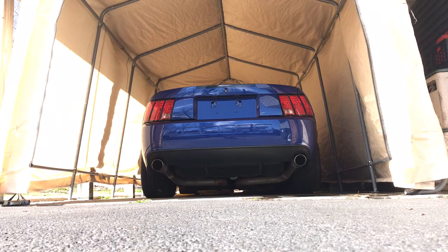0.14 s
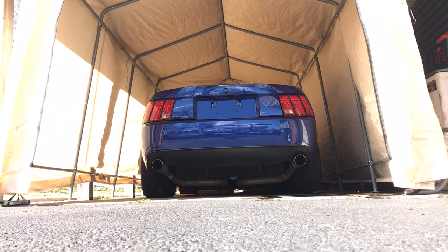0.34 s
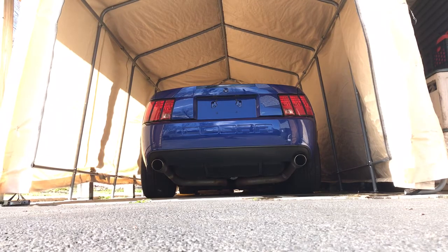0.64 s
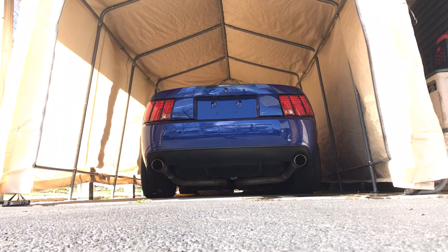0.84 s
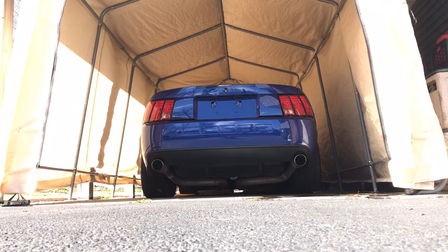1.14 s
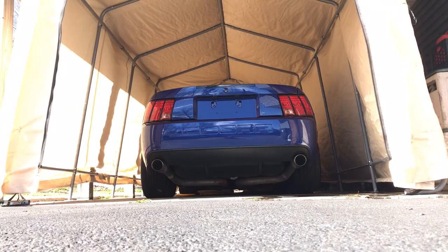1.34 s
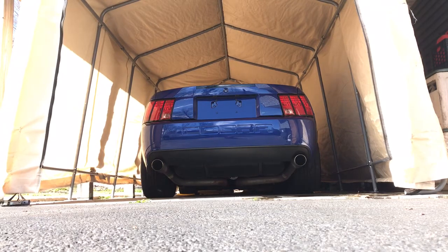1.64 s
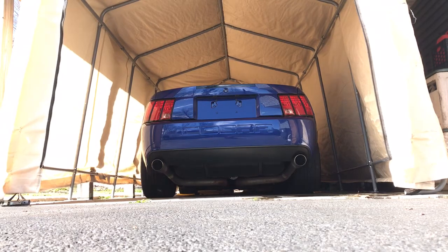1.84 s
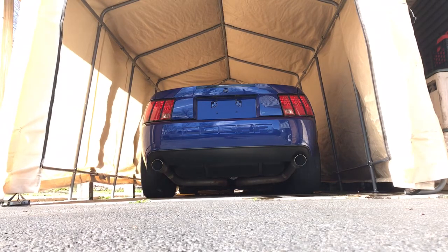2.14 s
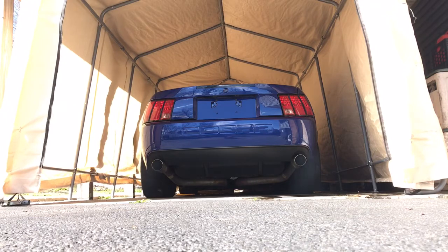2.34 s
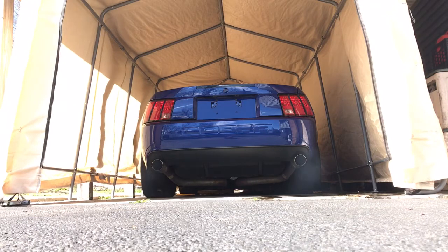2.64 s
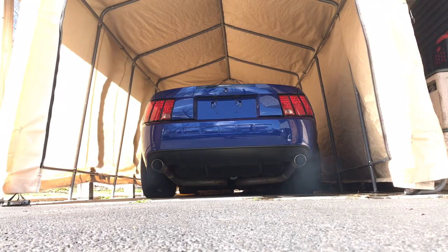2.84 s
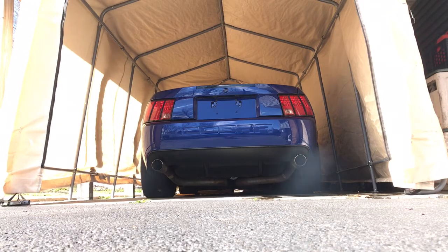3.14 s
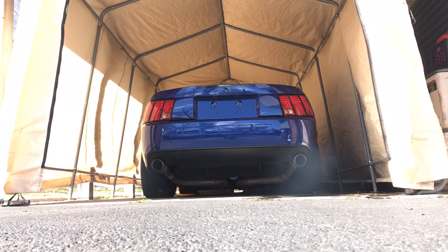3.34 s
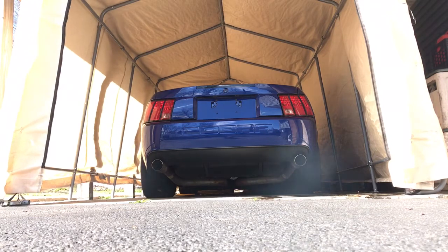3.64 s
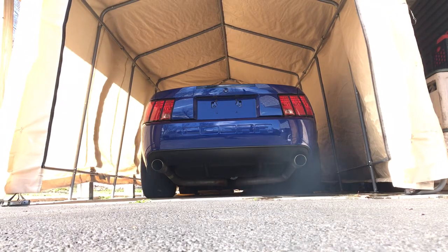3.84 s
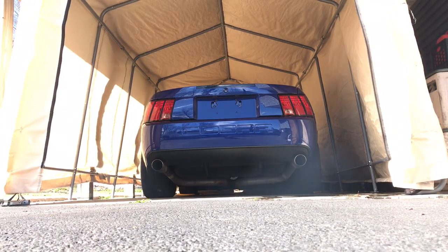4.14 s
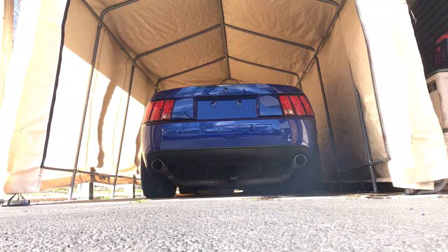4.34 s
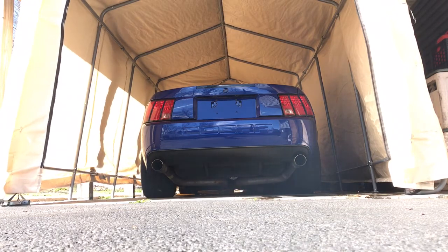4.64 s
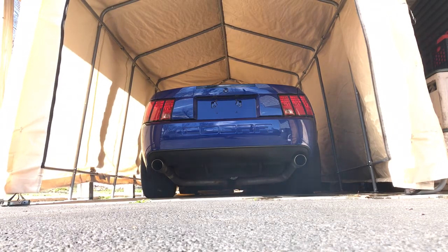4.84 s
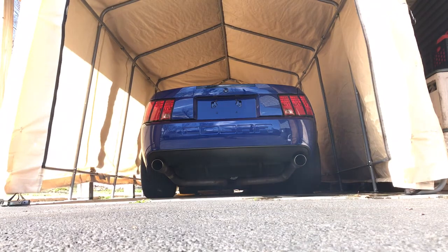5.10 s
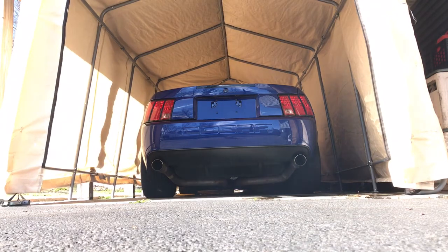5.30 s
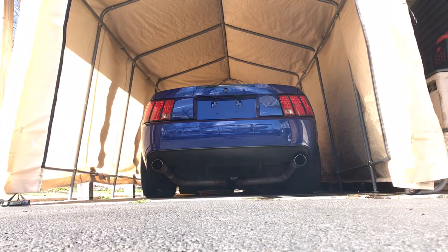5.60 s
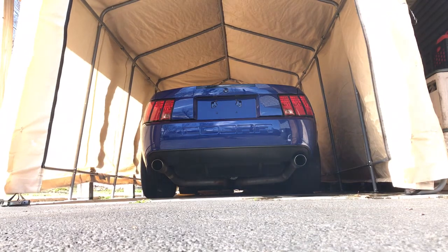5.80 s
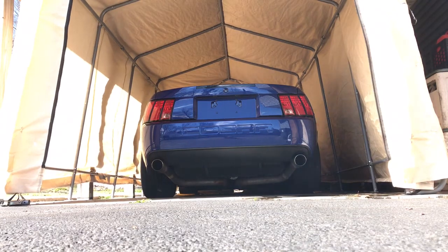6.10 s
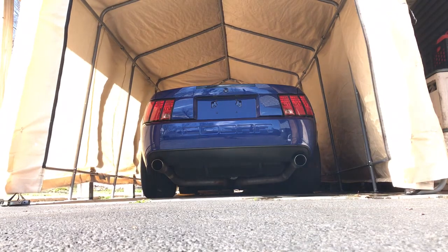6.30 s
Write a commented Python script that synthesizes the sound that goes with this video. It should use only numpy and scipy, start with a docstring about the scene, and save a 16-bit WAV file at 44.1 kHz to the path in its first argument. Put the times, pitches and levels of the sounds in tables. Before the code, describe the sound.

A V8 car engine cranks briefly, fires with a booming, hissing flare and settles into a fast, throbbing idle under a carport.

```python
"""A cold V8 is started under a fabric carport, heard from behind its two tailpipes.
First the starter grinds through four compressions over a faint rumble. At about half a second the
engine catches with a booming, hissing burst, the flare. It then sinks to a fast idle whose unequal
cylinders throb once in every cycle. Near 2.4 s the whole sound jumps ahead with a sharp click,
like a brief audio dropout, and the idle swells for a moment."""
import sys
import numpy as np
from scipy import signal
from scipy.fft import rfft, irfft
from scipy.io import wavfile
from scipy.ndimage import uniform_filter1d, minimum_filter1d

SR = 44100
rng = np.random.default_rng(int(sys.argv[2]) if len(sys.argv) > 2 else 0)


def unload_wav(signal):
    """Save mono or channel-first audio to the path in sys.argv[1] as 16-bit WAV at rate SR, clipped to [-1, 1]."""
    wavfile.write(
        sys.argv[1],
        SR,
        np.round(np.clip(np.atleast_2d(signal).T, -1, 1) * 32767).astype(np.int16),
    )


N = 284886
TIME = np.arange(N) / SR
CATCH_S, FIRST_FIRING_S, DROPOUT_S = 0.47, .48, 2.393

# how fast the starter's gear teeth meet: (time [s], pitch [Hz])
GEAR_PITCH = [(0, 333.4), (.07, 299.6), (.14, 348.2), (.2, 336.6), (.24, 416.4), (.31, 390), (.45, 439)]
# the starter pushes a piston through compression: (time [s], gear noise [dB], whine [dB])
COMPRESSION_STROKES = [(0.039, -28, -36.5), (0.17, -30, -28.5), (.268, -30.5, -46), (.366, -29, -45)]
# ringing of the starter's case: (pitch [Hz], width [Hz], level [dB])
CASE_RINGS = [(940, 440, -1.5), (1175, 30, 4), (1740, 47, 3), (1940, 29, -6), (2330, 51, 5), (2930, 78, 3),
              (3830, 55, 7)]
# tone of the grinding gears: (frequency [Hz], level [dB])
GEAR_COLOUR = [(59, -60), (100, -34), (166, -9), (334, -3), (511, -15.5), (717, -4.5), (832, -8.5),
               (1070, -9.5), (1190, -5.5), (1900, -8), (2110, -6), (2250, -8), (6490, -19.5), (11500, -32),
               (15800, -43)]
# tone of the swirling air's rumble, and of its roar in the mufflers: (frequency [Hz], level [dB])
RUMBLE_COLOUR = [(15, -21.5), (30, -5.5), (48, -4.5), (75, -4.5), (140, -10.5), (400, -27.5), (1500, -82.5)]
ROAR_COLOUR = [(60, -21), (150, -15.5), (350, -6.0), (600, 3.5), (1000, -6), (1400, -30.5), (3000, -50)]
# the engine catches, stumbles, races, sags and picks up again: (time [s], speed [turns per minute])
ENGINE_SPEED = [(.45, 1249), (.6, 1495), (.7, 1335), (.8, 1671), (.9, 1815), (1.15, 1748), (1.7, 1654),
                (2.05, 1569), (2.45, 1669.5), (3.1, 1635.5), (3.6, 1600.5), (5, 1613.7), (5.6, 1603.5),
                (6.46, 1575)]
# gas leaving the tailpipes, before flare and surges are added: (time [s], level [dB])
RUSH_LEVEL = [(2.3, -50.5), (2.9, -51.5), (4.1, -49.5)]
# tone of that gas in the flare and at idle: (frequency [Hz], level [dB])
FLARE_COLOUR = [(530, -12), (900, -5), (1230, -10), (1660, -0.5), (1870, -2.5), (1960, -7.5), (2380, -11.5),
                (2980, -5.5), (3450, -6.5), (3750, -4), (4600, -8.5), (6660, -10), (10400, -19),
                (12600, -21.5), (15800, -28)]
IDLE_COLOUR = [(530, -31.5), (900, -15), (1060, 0.5), (1100, -7), (1240, -6.5), (1640, -4.5), (1740, -8),
               (2060, -11.5), (3700, -11), (5120, -17), (6510, -18), (8780, -22), (10500, -28),
               (12400, -26), (15800, -34)]
# thin ringing of the steel pipe tips: (pitch [Hz], width [Hz], level [dB])
TIP_RINGS = [(1634, 66, -2.5), (2820, 600, -21.5), (4200, 930, -24.5), (6460, 1200, -8)]
# the cylinders in firing order; a bank is a row of four that shares a pipe:
# (bank [0 or 1], delay [share of the gap between firings], strength [dB], sharpness [dB per octave])
FIRING_ORDER = [(0, -0.564, 8.5, 3), (0, -0.596, 2, -1), (1, -0.4915, 8.5, 2), (0, -0.533, 2.8, 2.3),
                (1, -0.537, 6.5, 2), (1, -0.469, 6, -3), (0, -0.617, 7.5, 3.7), (1, -0.517, 5.5, 0.7)]
# how unevenly the fuel burns: (time [s], roughness [0-1])
ROUGHNESS = [(.45, .6), (.72, .18), (2.2, .15), (3.6, .08)]
# ringing of each pipe and muffler: (bank [0 or 1], pitch [Hz], width [Hz], level [dB], sign [+1 or -1])
PIPE_RINGS = [(0, 120, 42.6, -23.5, 1), (0, 187.9, 53.1, -26.5, 1), (0, 309.6, 67, -25.5, -1),
              (0, 313.8, 33.4, -29.5, 1), (0, 478.8, 59, -40, 1), (0, 599.5, 49, -49.5, -1),
              (0, 678.5, 127, -55.5, -1), (0, 794.6, 73.2, -61.5, -1), (1, 124.7, 54.1, -28, 1),
              (1, 190.6, 45.5, -31, 1), (1, 280, 89, -27.5, 1), (1, 288.3, 54.9, -21, -1),
              (1, 373.3, 30.4, -32, 1), (1, 426, 44, -40, 1), (1, 561.4, 50.6, -51, -1),
              (1, 815, 252, -64.5, 1), (1, 1046, 48.8, -75, 1)]
# the exhaust's low boom, middle bark and high rasp, one row each:
# (centre [Hz], idle level [dB], change for weak first firings [dB], for flare [dB], for top speed [dB])
EXHAUST_BANDS = [(115, -0.5, -24, 8.5, -8), (290, 0.26, -24.5, 1.5, -1.5), (735, -1.7, -31.5, 6.5, 2.5)]
# the engine works harder, three times as it catches and once as the idle picks up:
# (time [s], half width [s], boom [dB], bark [dB], rasp [dB], rush [dB])
LOAD_SURGES = [(.596, 0.022, 9.5, -1, 3, 0.5), (.648, 0.046, 3, 11.5, 9, 3), (.785, 0.075, 3, 0.5, 6, -1),
               (2.6, 0.27, 1, .6, 3.5, 0.5)]


def amp(db):
    """Turns decibels into a gain to multiply by."""
    return 10 ** (np.asarray(db) / 20)


def unit(x):
    """Scales a sound to an average power of 1."""
    return x / np.sqrt(np.mean(x ** 2) + 1e-20)


def curve(rows):
    """Joins (time, value) points with straight lines, giving a value for every sample."""
    return np.interp(TIME, *np.transpose(rows))


def swell(time_s, half_width_s):
    """A smooth rise and fall of height 1."""
    return np.exp(-((TIME - time_s) / half_width_s) ** 2)


def colour(x, points):
    """Shapes a sound's lows and highs, then scales it to a power of 1."""
    hz, db = np.transpose(points)
    log_hz = np.log(np.fft.rfftfreq(N, 1 / SR) + 1)
    gain = amp(np.interp(log_hz, np.log(hz + 1), db))
    return unit(irfft(rfft(x) * gain, N))


def ring(x, hz, width):
    """Makes a sound ring at one pitch; a smaller width rings longer."""
    t, rate = TIME[:SR // 4], np.pi * width
    response = 2 * rate ** 2 * t * np.exp(-rate * t) * np.cos(2 * np.pi * hz * t) / SR
    return signal.oaconvolve(x, response)[:N]


def carport(x, wet=0.38, length_s=.02, count=24):
    """Adds quick echoes from the ground, car body, walls and roof."""
    delay, sign = rng.random(count), rng.choice([-1, 1], count)
    size = sign * np.exp(-delay)
    echoes = np.bincount((delay * length_s * SR).astype(int), wet * size / np.linalg.norm(size))
    return (x + signal.oaconvolve(x, echoes)[:N]) / np.hypot(1, wet)


def starter(chatter=0.3, grind=1.02, hiss_hz=5500, off_s=0.42, fade_db_per_s=150):
    """Gear teeth scrape and whine, louder at each compression, and fade once the starter lets go."""
    phase = 2 * np.pi * np.cumsum(curve(GEAR_PITCH)) / SR
    scrape = (1 + chatter * np.cos(phase)) * rng.standard_normal(N)
    overtones = sum(np.cos(k * phase + 2 * np.pi * rng.random()) for k in range(2, 14)) / 14
    teeth = carport(scrape) + grind * overtones
    case = sum(amp(db) * ring(teeth, hz, width) for hz, width, db in CASE_RINGS)
    teeth = colour(teeth + amp(-3) * case, GEAR_COLOUR)
    hiss = signal.sosfiltfilt(signal.butter(2, hiss_hz, "high", fs=SR, output="sos"), teeth)
    whine = unit(np.sin(phase) + amp(-19) * np.sin(2 * phase))
    # gears and whine swell above a steady floor, while the hiss stays even
    gear_power = sum(amp(db) ** 2 * swell(s, 0.034) for s, db, _ in COMPRESSION_STROKES)
    whine_swells = sum(amp(db) * swell(s, 0.025) for s, _, db in COMPRESSION_STROKES)
    gear_gain = np.sqrt(amp(-35) ** 2 + gear_power)
    whine_gain = np.hypot(amp(-48), whine_swells)
    sound = gear_gain * (teeth - hiss) + amp(-27.5) * hiss + whine_gain * whine
    return sound * amp(-fade_db_per_s * np.maximum(TIME - off_s, 0))


def swirling_air(start_db=-44, idle_db=-54, whump_db=-19):
    """Swirls rumble, whump as the engine catches, and roar softly in the mufflers, more under load."""
    level = amp(np.interp(TIME, [1.15, 1.4], [start_db, idle_db])) + amp(whump_db) * swell(0.58, 0.072)
    rumble = colour(rng.standard_normal(N), RUMBLE_COLOUR) * level
    roar = colour(rng.standard_normal(N), ROAR_COLOUR)
    rasp_db = band_levels()[2]
    return rumble + roar * amp(rasp_db - 49.5)


def flare(rise_s=0.066, hold_s=.11, fade_s=0.27):
    """The extra air and fuel of the start, from 0 to 1: it rises, holds and dies away."""
    age = TIME - CATCH_S
    return np.clip(age / rise_s, 0, 1) * np.exp(-np.maximum(age - rise_s - hold_s, 0) / fade_s)


def surges():
    """Decibels that short spells of harder work add to boom, bark, rasp and rush."""
    return sum(np.outer(gains_db, swell(s, half_width)) for s, half_width, *gains_db in LOAD_SURGES)


def band_levels(build_s=0.039, idle_rpm=1600, top_rpm=1815):
    """Boom, bark and rasp in dB: they build as the engine catches, then follow flare, speed and surges."""
    weak = np.exp(-np.maximum(TIME - CATCH_S, 0) / build_s)
    racing = np.maximum(curve(ENGINE_SPEED) - idle_rpm, 0) / (top_rpm - idle_rpm)
    return [idle_db + weak_db * weak + flare_db * flare() + racing_db * racing + surge_db
            for (_, idle_db, weak_db, flare_db, racing_db), surge_db in zip(EXHAUST_BANDS, surges())]


def firing_count(start_cycles=.8776, jump_cycles=.319):
    """Counts eight firings to each cycle of two engine turns; the count jumps ahead at the dropout."""
    cycles = start_cycles + np.cumsum(curve(ENGINE_SPEED)) / 120 / SR
    return 8 * (cycles + jump_cycles * (TIME > DROPOUT_S))


def gas_rush(firings, pulsing=0.092, throb=0.058, flare_db=21.5, opening_db=15):
    """Gas hisses out in puffs with the firings, loud and bright in the flare and duller at idle."""
    puffs = 1 + pulsing * np.cos(2 * np.pi * firings) - throb * np.cos(2 * np.pi * firings / 8)
    gas = puffs * rng.standard_normal(N)
    gas = gas + sum(amp(db) * ring(gas, hz, width) for hz, width, db in TIP_RINGS)
    bright = np.interp(TIME, [0.7, 1.2], [1, 0])
    hiss = np.sqrt(bright) * colour(gas, FLARE_COLOUR) + np.sqrt(1 - bright) * colour(gas, IDLE_COLOUR)
    hiss /= np.sqrt(bright) + np.sqrt(1 - bright)
    running = amp(flare_db * flare() + surges()[-1]) * (TIME > CATCH_S)
    opening = amp(opening_db) * swell(CATCH_S, 0.045)  # air gets through just before the fuel burns
    return amp(curve(RUSH_LEVEL)) * (running + opening) * hiss


def exhaust(firings, gain_db=-40.5, scatter_db=6.5, jitter=0.1, flutter_db=1.8):
    """Each cylinder sends a pulse down its bank's pipe; the banks take turns unevenly, so it burbles."""
    number = np.arange(np.ceil(np.interp(FIRST_FIRING_S, TIME, firings)), firings[-1]).astype(int)
    bank, delay, strength_db, sharpness = np.array(FIRING_ORDER)[number % 8].T
    random_delay, random_strength, random_edge = rng.standard_normal((len(number), 3)).T
    rough = np.interp(np.interp(number, firings, TIME), *np.transpose(ROUGHNESS))
    starts = np.interp(number + delay + jitter * rough * random_delay, firings, np.arange(N)).astype(int)
    strength_db = strength_db + rough * scatter_db * random_strength
    bark_hz = EXHAUST_BANDS[1][0]
    sound = np.zeros(N)
    for side, hz, width, db, sign in PIPE_RINGS:
        # sharper pulses set the high pitches ringing more
        octaves = np.log2(hz / bark_hz)
        edge_db = sharpness * octaves + flutter_db * random_edge * max(octaves, 0)
        size = (bank == side) * amp(db + strength_db + edge_db)
        sound += sign * ring(np.bincount(starts, size, N) * SR, hz, width)
    return amp(gain_db) * engine_load(pipe_echo(sound))


def pipe_echo(pulses, round_trip_s=.00857, reflected=.3, bass_cut_hz=80):
    """Pulses bounce between the pipe's ends, fainter each time; deep bass barely gets out."""
    trips = np.arange(6)
    echoes = np.bincount(trips * round(round_trip_s * SR), reflected ** trips)
    wave = signal.oaconvolve(pulses, echoes)[:N]
    return signal.sosfilt(signal.butter(3, bass_cut_hz, "high", fs=SR, output="sos"), wave)


def engine_load(x):
    """How hard the fuel burns sets the exhaust's boom, bark and rasp."""
    log_hz, spectrum = np.log(np.fft.rfftfreq(N, 1 / SR) + 1), rfft(x)
    log_centres = np.log(np.array(EXHAUST_BANDS)[:, 0])
    bands = [np.interp(log_hz, log_centres, row) for row in np.eye(len(EXHAUST_BANDS))]
    return sum(amp(db) * irfft(spectrum * band, N) for band, db in zip(bands, band_levels()))


def dropout_click(level_db=-12, fade_s=0.0033):
    """A sharp click as the sound jumps ahead, like a brief audio dropout: a sudden step that fades."""
    age = TIME - DROPOUT_S
    return -amp(level_db) * (age > 0) * np.exp(-abs(age) / fade_s)


def scene():
    """Adds all the sounds together in one channel."""
    firings = firing_count()
    engine = starter() + swirling_air() + carport(gas_rush(firings)) + exhaust(firings)
    return (engine + dropout_click())[None]


def record(dry, ceiling=.7, top_hz=15800):
    """Quickly turns down the flare's loudest peaks, then cuts the very highest treble."""
    allowed = np.minimum(1, ceiling / (abs(dry) + 1e-9))
    gain = uniform_filter1d(minimum_filter1d(allowed, size=300), size=300)
    treble_cut = signal.firwin(511, top_hz, window=("kaiser", 9), fs=SR)
    return signal.oaconvolve(dry * gain, treble_cut[None], "same")


dry = scene()
out = record(dry)
unload_wav(out)
```